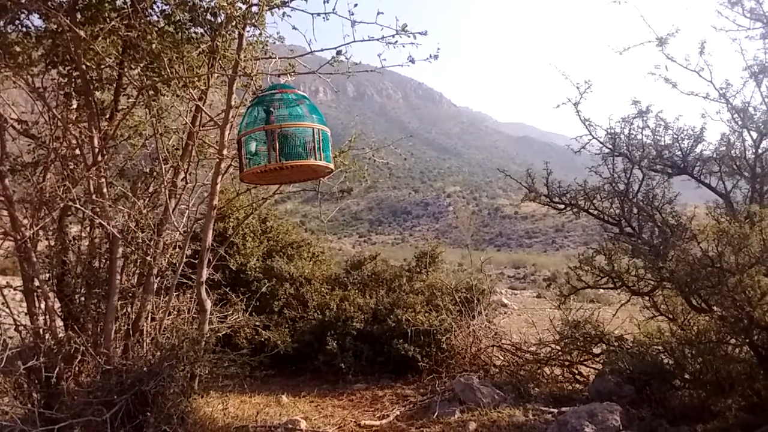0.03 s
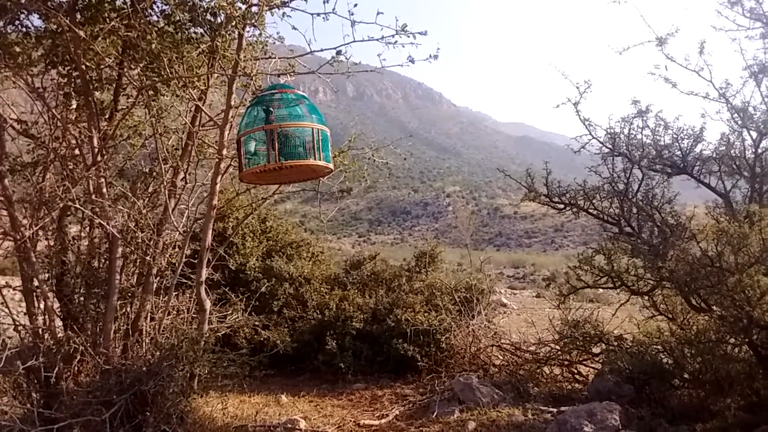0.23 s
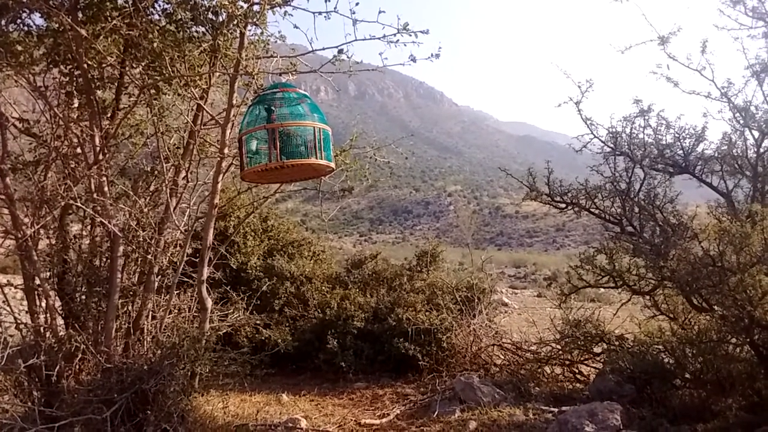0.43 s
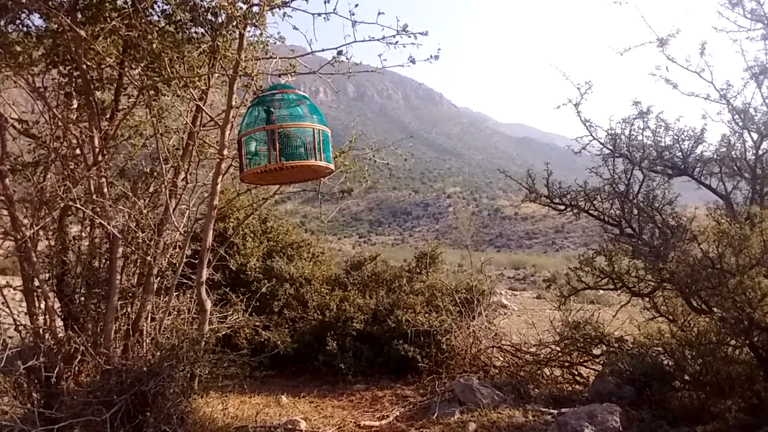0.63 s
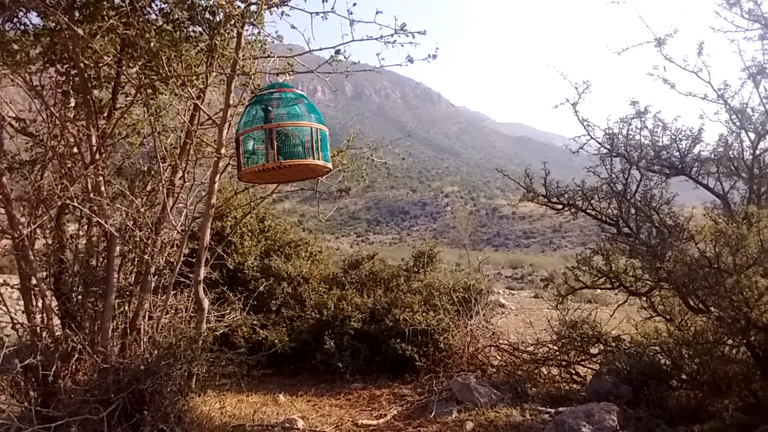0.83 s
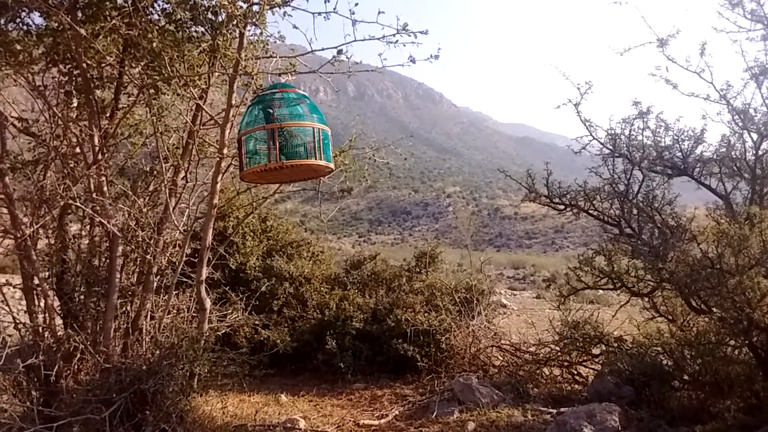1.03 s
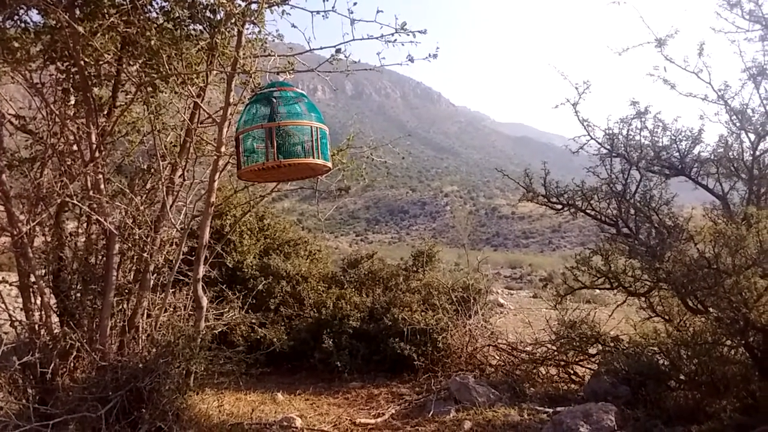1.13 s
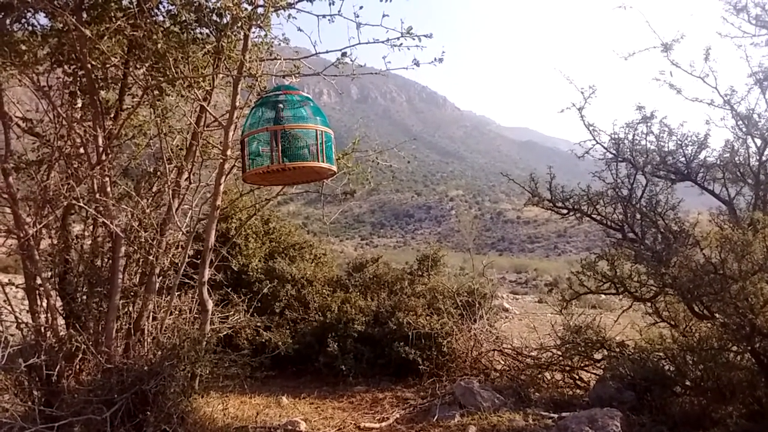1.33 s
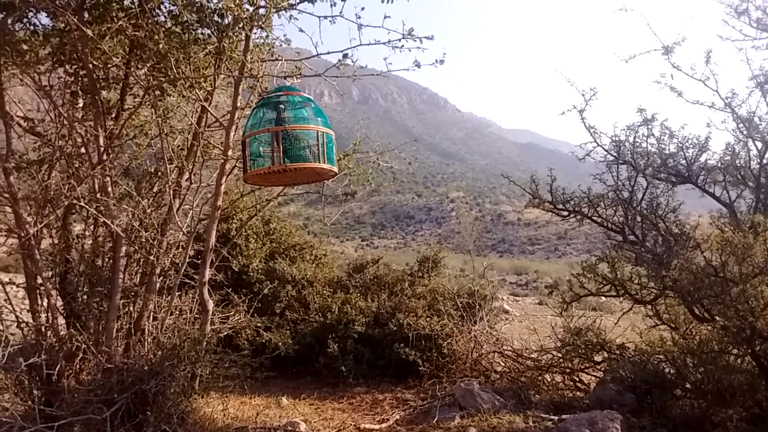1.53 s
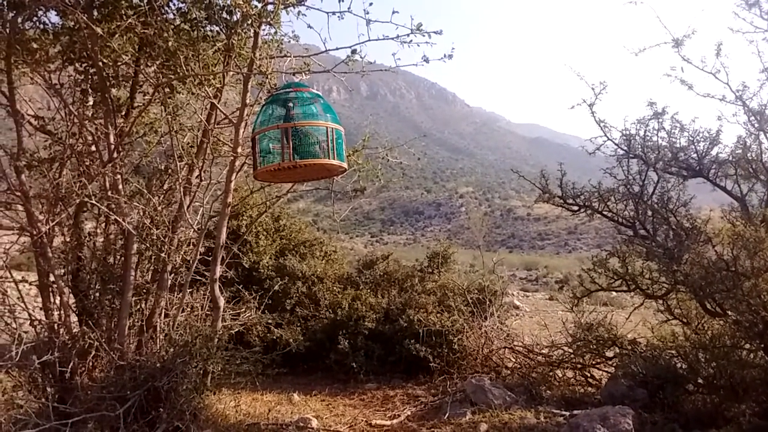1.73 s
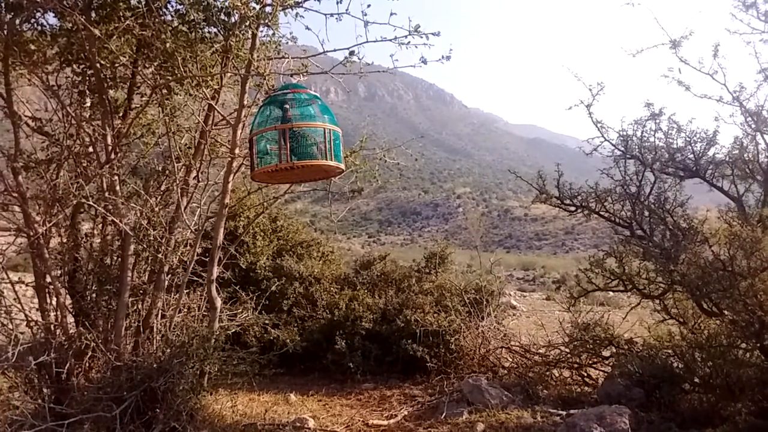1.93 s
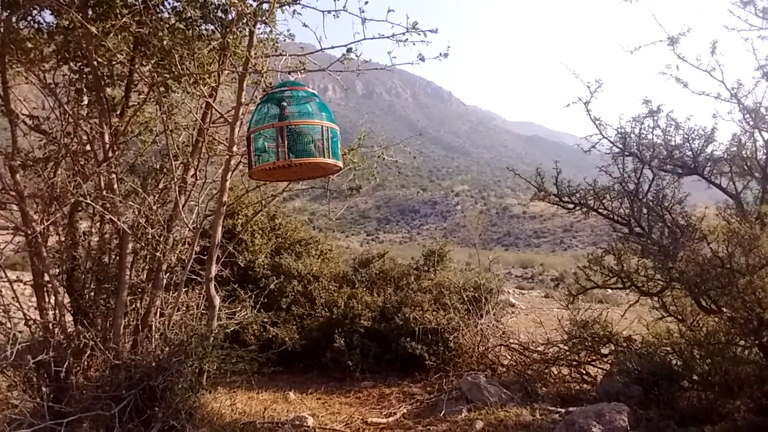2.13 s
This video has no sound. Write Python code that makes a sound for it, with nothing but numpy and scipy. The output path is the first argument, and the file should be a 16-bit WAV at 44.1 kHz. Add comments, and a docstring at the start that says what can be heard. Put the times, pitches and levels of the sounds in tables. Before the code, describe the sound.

A caged partridge-like bird gives one quick sharp whistle and harsh cluck in quiet dry scrub

```python
"""Light wind that rises slowly, a faint wavering hum and a few small ticks in the brush of dry scrub.
At 1.08 s a caged francolin a few metres away gives a quick whistle that dips and leaps, with a beak click;
a soft low chirp and a harsh falling cluck follow. Ground, rocks and scrub echo the calls.
At 1.63 s a foot scuffs dry litter once: a thud and grainy hiss. Voices are gliding harmonics plus breath
noise. A phone with two microphones widens the picture by taking from each side a late copy of the other."""
import sys
import numpy as np
from scipy import signal
from scipy.fft import rfft, irfft
from scipy.io import wavfile
from scipy.ndimage import uniform_filter1d

SR = 44100
rng = np.random.default_rng(int(sys.argv[2]) if len(sys.argv) > 2 else 0)


def master_out(mix):
    """Clip the mix to full scale and print it as 16-bit PCM to the path in sys.argv[1]."""
    frames = np.transpose(np.atleast_2d(mix))
    ceiling = np.clip(frames, -1, 1)
    pcm = np.round(ceiling * 32767).astype(np.int16)
    wavfile.write(sys.argv[1], SR, pcm)


N = 96711
T = np.arange(N) / SR
HZ = np.fft.rfftfreq(N, 1 / SR)
TOP_HZ = 15520  # upper limit of the voices and of the recorder


def amp(db):
    """Decibels to linear gain."""
    return 10 ** (np.asarray(db) / 20)


def colour_db(hz, table):
    """Level of a (frequency [Hz], level [dB]) table on a log frequency axis."""
    table_hz, table_db = np.array(table).T
    return np.interp(np.log(np.maximum(hz, 1)), np.log(table_hz), table_db)


def tint(x, table):
    """Zero-phase filter by a (frequency [Hz], level [dB]) table."""
    return irfft(rfft(x) * amp(colour_db(HZ, table)), N)


def late(x, delay_s):
    """Delay, fractions of a sample included, by linear phase."""
    return irfft(rfft(x) * np.exp(-2j * np.pi * HZ * delay_s), N)


def walk(rate_hz):
    """Smooth random signal of unit spread: noise averaged twice over 1 / rate_hz."""
    width = max(int(SR / rate_hz), 1)
    smooth = uniform_filter1d(rng.standard_normal(N), width)
    smooth = uniform_filter1d(smooth, width)
    return smooth / smooth.std()


def decay(age_s, t60_s):
    """Exponential decay by 60 dB in t60_s."""
    return np.exp(-np.log(1000) * age_s / t60_s)


def ring(start_s, hz, t60_s, attack_s):
    """Damped sine with a linear attack."""
    age_s = np.maximum(T - start_s, 0)
    return np.sin(2 * np.pi * hz * age_s) * decay(age_s, t60_s) * np.minimum(age_s / attack_s, 1)


def air():
    """Wind and microphone hiss: octave bands flutter separately; the microphones partly share the bass."""
    # (frequency [Hz], density at time 0 [dB per Hz])
    air_density = [(20, -103), (45, -81), (90, -75.5), (140, -76.5), (220, -82.5), (500, -91), (1000, -94),
                   (2000, -97.5), (3000, -99), (4500, -102), (6000, -107), (8000, -107), (11000, -107),
                   (15500, -109)]
    rise_db_per_s, flutter_db, flutter_hz = 1.26, 1.18, 9.1
    bass_hz, bass_share, bass_right_db = 304, .45, 2.5
    bass = 1 / (1 + (HZ / bass_hz) ** 2)
    share = bass_share * bass
    first, other = rfft(rng.standard_normal((2, N)))
    second = (share * first + np.sqrt(1 - share ** 2) * other) * amp(bass_right_db * bass)
    spectrum = np.array([first, second]) * amp(colour_db(HZ, air_density)) * np.sqrt(SR / 2)
    octave = np.log2(np.maximum(HZ, 1))
    total = np.zeros((2, N))
    for centre in range(4, 15):  # triangular bands that sum to one
        band = irfft(spectrum * np.clip(1 - abs(octave - centre), 0, 1), N)
        total += band * amp(rise_db_per_s * T + flutter_db * walk(flutter_hz))
    return total


def hum():
    """Narrow band of noise, heard as a wavering hum to the right."""
    centre_hz, width_hz, right_rms_db = 328.3, 8.9, -62.5
    band = np.exp(-((HZ - centre_hz) / width_hz) ** 2)
    x = irfft(rfft(rng.standard_normal(N)) * band, N)
    return amp(right_rms_db) * x / x.std() * np.array([[.3], [1]])


def ticks():
    """Small ticks in the brush: short damped tones, stronger on the left."""
    # (time [s], level before damping [dB], pitch [Hz], t60 [s])
    tick_list = [(.262, -49, 1000, .05), (.582, -50, 1250, .03), (.606, -53, 2750, .025),
                 (.607, -54, 4100, .025)]
    x = sum(amp(db) * ring(s, hz, t60_s, attack_s=.00085) for s, db, hz, t60_s in tick_list)
    return x * np.array([[1], [.5]])


def voice(track, harmonic_db, count, rasp_db, half_db=None, wobble=.06):
    """Uneven harmonics on a gliding pitch, with breath noise puffed once a cycle."""
    # breath noise colour: (frequency [Hz], relative level [dB])
    rasp_colour = [(700, -11), (2000, 7.5), (4000, 21), (5500, -7), (7500, 4), (9000, -11), (10000, 1),
                   (11500, -16), (13000, -14), (15000, -26)]
    wobble_hz = 300
    spread_rad = .2  # higher harmonics leave the throat later: phase lag per harmonic number squared
    s, hz, db = np.array(track).T[:3]
    pitch_hz = np.interp(T, s, hz)
    gain = amp(np.interp(T, s, db, left=-200, right=-200))
    phase = 2 * np.pi * np.cumsum(pitch_hz) / SR
    tone = np.zeros(N)
    for k in range(1, count + 1):
        level = amp(harmonic_db(k, k * pitch_hz)) * (1 + wobble * walk(wobble_hz))
        tone += level * np.cos(k * phase - spread_rad * k ** 2) * (k * pitch_hz < TOP_HZ)
    if half_db is not None:  # every second pulse weaker
        tone = tone * (1 + amp(np.interp(T, *np.array(half_db).T)) * np.cos(phase / 2))
    rasp = tint(rng.standard_normal(N), rasp_colour) * (1 + np.cos(phase))
    return gain * (tone + amp(rasp_db) * rasp / rasp.std())


def whistled_db(k, hz):
    """Harmonic levels of the whistled sounds against their level curves."""
    # second harmonic: (frequency [Hz], relative level [dB])
    octave_colour = [(3000, -20), (6000, -26), (8500, -30), (9900, -9), (10500, -16), (11200, -20)]
    return 1.5 if k == 1 else colour_db(hz, octave_colour)


def whistle():
    """Whistle of two harmonics that dips and then leaps up."""
    # (time [s], pitch [Hz], level curve [dB])
    whistle_track = [(1.0785, 3100, -54), (1.081, 3000, -29), (1.083, 1960, -21), (1.0843, 1610, -17),
                     (1.0858, 1430, -26), (1.0872, 1490, -26), (1.0885, 1400, -38), (1.0905, 1850, -42),
                     (1.093, 1600, -42), (1.095, 1540, -27), (1.0968, 1930, -30), (1.0980, 3200, -30),
                     (1.0990, 4450, -24), (1.100, 4900, -22.5), (1.102, 5200, -19), (1.103, 5270, -17),
                     (1.105, 5460, -18), (1.106, 5540, -23), (1.107, 5580, -17.5), (1.109, 5590, -18),
                     (1.1105, 5490, -21), (1.113, 5080, -32), (1.115, 4900, -38), (1.117, 4850, -60)]
    return voice(whistle_track, whistled_db, count=2, rasp_db=-21.5)


def snap():
    """Harsh click as the beak opens: a short burst of coloured noise."""
    # (frequency [Hz], relative level [dB])
    snap_colour = [(800, -17), (1300, 10), (3500, 1), (4500, 1), (5700, 11), (7500, -13), (9000, 0),
                   (10500, 0), (12000, -16), (15000, -8)]
    start_s, attack_s, t60_s, level_db = 1.0805, .0007, .045, -34
    x = tint(rng.standard_normal(N), snap_colour)
    age_s = np.maximum(T - start_s, 0)
    return amp(level_db) * x / x.std() * np.minimum(age_s / attack_s, 1) * decay(age_s, t60_s)


def low_voices():
    """Rough undertone lingering under the whistle's leap, then a soft low chirp before the cluck."""
    # both: (time [s], pitch [Hz], level curve [dB])
    undertone_track = [(1.0975, 1900, -50), (1.099, 2050, -36), (1.1005, 1900, -40), (1.103, 2100, -41),
                       (1.106, 1750, -44), (1.109, 1500, -58)]
    chirp_track = [(1.1268, 2150, -58), (1.128, 1900, -39), (1.131, 1650, -42), (1.133, 1450, -41),
                   (1.137, 1250, -46), (1.140, 1200, -60)]
    return sum(voice(track, whistled_db, count=2, rasp_db=-11, wobble=.45)
               for track in (undertone_track, chirp_track))


def cluck():
    """Harsh falling cluck: twelve harmonics coloured by throat and beak."""
    # (time [s], pitch [Hz], level curve [dB], level of the steadier fundamental [dB])
    cluck_track = [(1.161, 886, -60, -70), (1.165, 915, -33, -40), (1.168, 960, -21, -33),
                   (1.1705, 984, -18, -32), (1.174, 966, -23, -31.5), (1.181, 930, -18, -34),
                   (1.188, 858, -26, -36.5), (1.194, 824, -33, -42), (1.1965, 815, -36, -46),
                   (1.198, 805, -56, -60)]
    # (frequency [Hz], relative level [dB])
    throat_colour = [(1650, -5), (1950, -3.5), (2500, 1.5), (2850, -3), (3300, -0.5), (3750, -9.5),
                     (4400, -11), (4900, -15.5), (5600, -25.5), (6800, -34), (8500, -40), (11000, -57)]
    # alternation of strong and weak pulses: (time [s], modulation depth [dB])
    half_lines = [(1.163, -12), (1.171, -19), (1.175, -22), (1.178, -36), (1.184, -28), (1.198, -24)]
    s, _, db, first_db = np.array(cluck_track).T

    def clucked_db(k, hz):
        """Fundamental on its own curve, the rest by the throat."""
        return np.interp(T, s, first_db - db) if k == 1 else colour_db(hz, throat_colour)

    return voice(cluck_track, clucked_db, count=12, rasp_db=-15.5, half_db=half_lines, wobble=.14)


def scrub_tail():
    """Scattering by the scrub: decaying low-passed noise, independent for each microphone."""
    t60_s, top_hz, level_db = .11, 7040, -17
    age_s = T[:SR // 2]
    tail = rng.standard_normal((2, len(age_s))) * decay(age_s, t60_s)
    tail = tail / np.sqrt((tail ** 2).sum(1, keepdims=True))
    return amp(level_db) * signal.lfilter(*signal.butter(1, top_hz, fs=SR), tail)


def bird():
    """The calls heard directly, by single echoes and scattered by the scrub."""
    # single echoes: (delay [s], level [dB])
    echo_list = [(.0028, -17), (.0062, -12)]
    # colour of everything sent back: (frequency [Hz], level [dB])
    ground_colour = [(2000, -9), (4500, -3), (5500, 3), (10000, 2), (10800, -10)]
    # second microphone against the first: (frequency [Hz], level [dB])
    second_mic = [(1000, -1.5), (2000, 0), (2800, 3), (3600, -1), (4800, 5), (5250, 5), (5600, 1.5),
                  (9000, -1), (12000, -1)]
    second_mic_lag_s = .000088
    calls = whistle() + snap() + low_voices() + cluck()
    back = tint(calls, ground_colour)
    near = calls + sum(amp(db) * late(back, delay_s) for delay_s, db in echo_list)
    pair = np.array([near, late(tint(near, second_mic), second_mic_lag_s)])
    return pair + signal.fftconvolve(back[None], scrub_tail(), axes=1)[:, :N]


def scuff():
    """Foot on dry litter: a grainy hiss, stronger on the right, and a soft thud on the left."""
    # (frequency [Hz], relative level [dB])
    litter_colour = [(400, -5), (1000, -2), (2300, -3), (3100, -3), (3900, 2), (5500, -7.5), (7000, 0),
                     (8400, 1), (10000, -4.5), (14000, -15)]
    start_s, attack_s, hold_s, t60_s = 1.6255, .003, .018, .24  # hold counts from the start
    level_db, left_db, grain_db, grain_hz = -47, -2, 1.8, 1200
    age_s = T - start_s
    envelope = np.clip(age_s / attack_s, 0, 1) * decay(np.maximum(age_s - hold_s, 0), t60_s)
    hiss = tint(rng.standard_normal((2, N)), litter_colour) * amp(grain_db * walk(grain_hz))
    hiss = amp(level_db) * envelope * hiss / hiss.std() * amp([[left_db], [-left_db]])
    thud = amp(-29) * ring(start_s + .003, hz=85, t60_s=.045, attack_s=.00098)
    return hiss + thud * np.array([[1], [0]])


def scene():
    """Sum of all sources at the two microphones."""
    return air() + hum() + ticks() + bird() + scuff()


def record(dry):
    """Stereo widening: each side loses a late copy of the other; a steep low-pass cuts the top."""
    # (frequency [Hz], phase lag [turns], level [dB])
    cross_table = [(0, 0, -6), (1600, .5, -3), (3150, 1, -2.5), (4900, 1.5, -4), (6400, 2, -1.5),
                   (8100, 2.5, -9), (9400, 3, -12), (12200, 3.5, -10), (13950, 4, -4), (15400, 4.5, -4)]
    hz, turns, db = np.array(cross_table).T
    cross = amp(np.interp(HZ, hz, db)) * np.exp(-2j * np.pi * np.interp(HZ, hz, turns))
    wide = dry - irfft(rfft(dry[::-1]) * cross, N)
    low_pass = signal.ellip(16, .2, 70, TOP_HZ, fs=SR, output="sos")
    return signal.sosfilt(low_pass, wide)


dry = scene()
out = record(dry)
master_out(out)
```